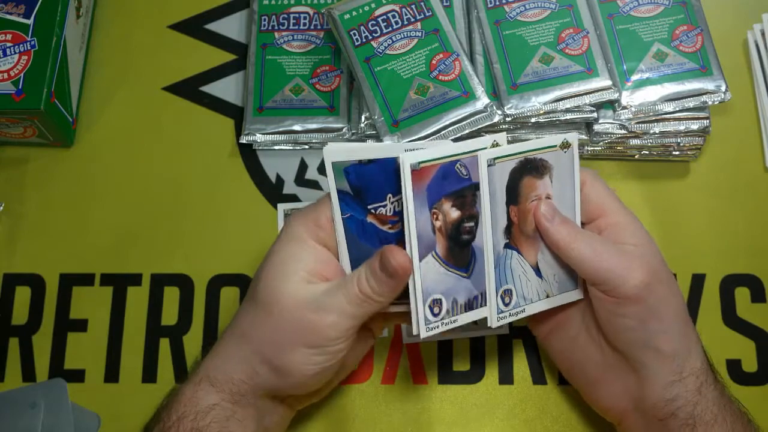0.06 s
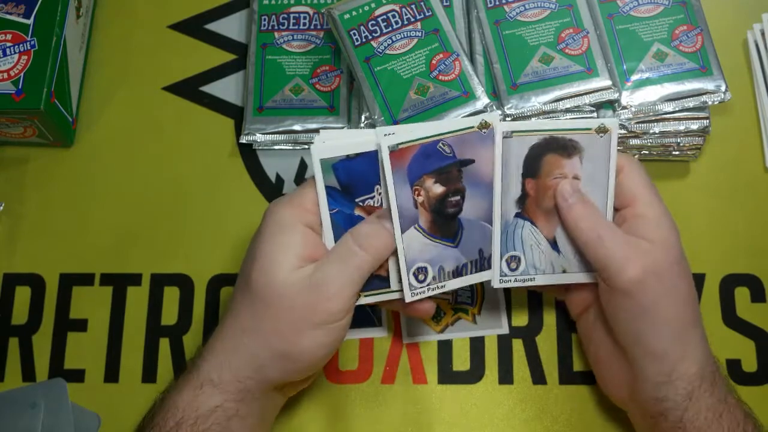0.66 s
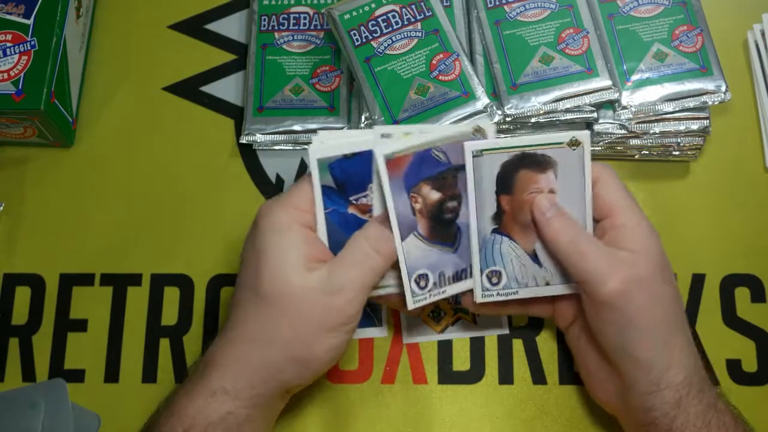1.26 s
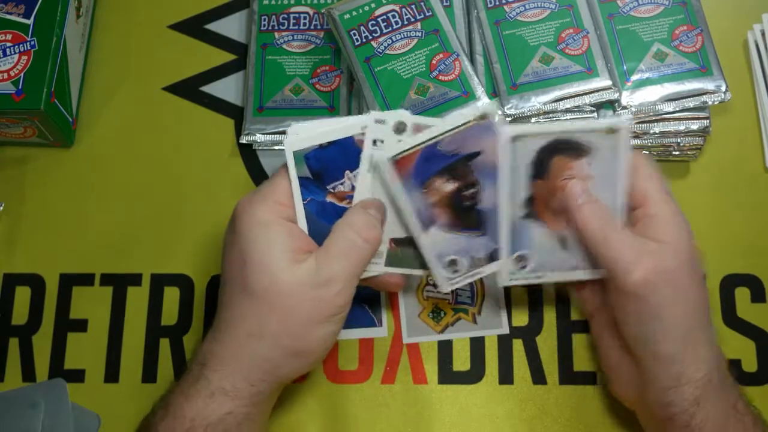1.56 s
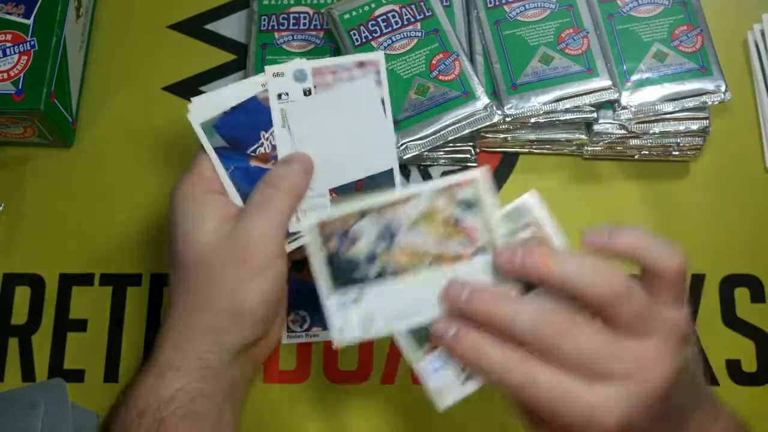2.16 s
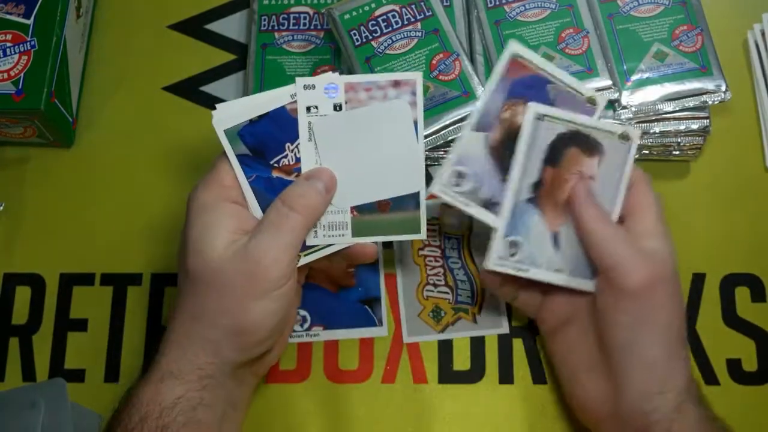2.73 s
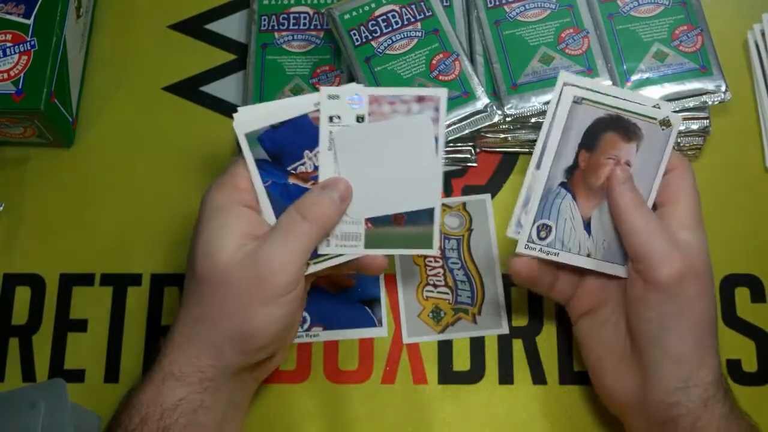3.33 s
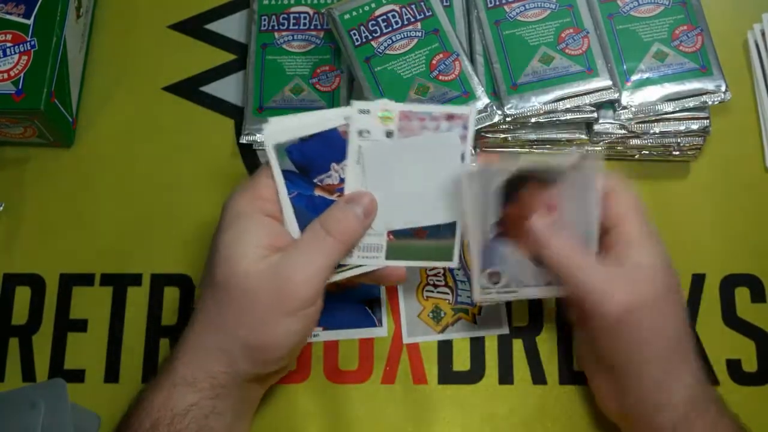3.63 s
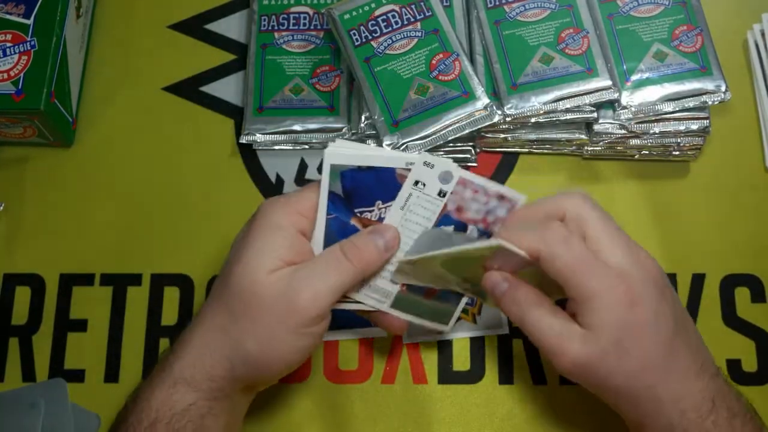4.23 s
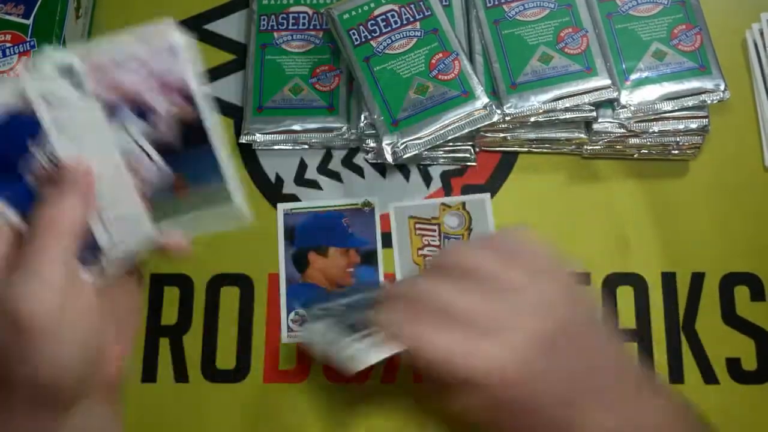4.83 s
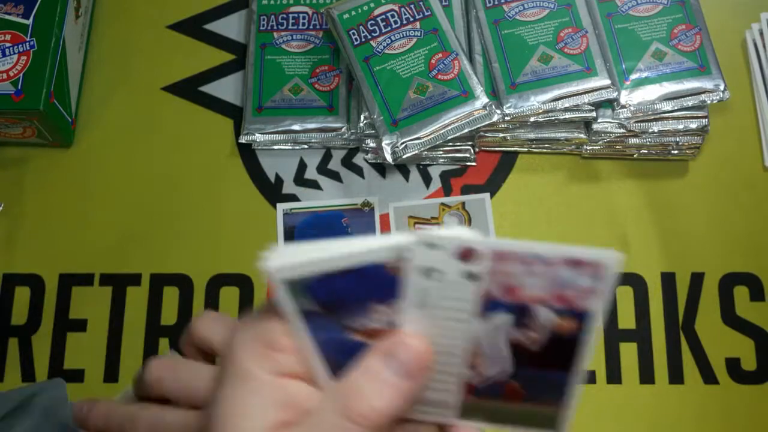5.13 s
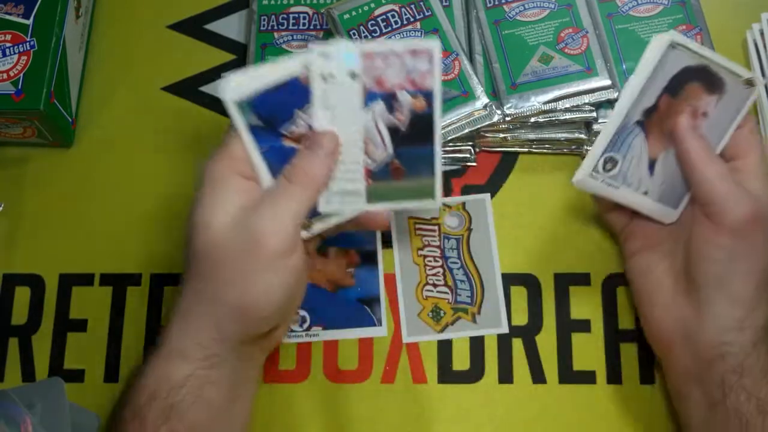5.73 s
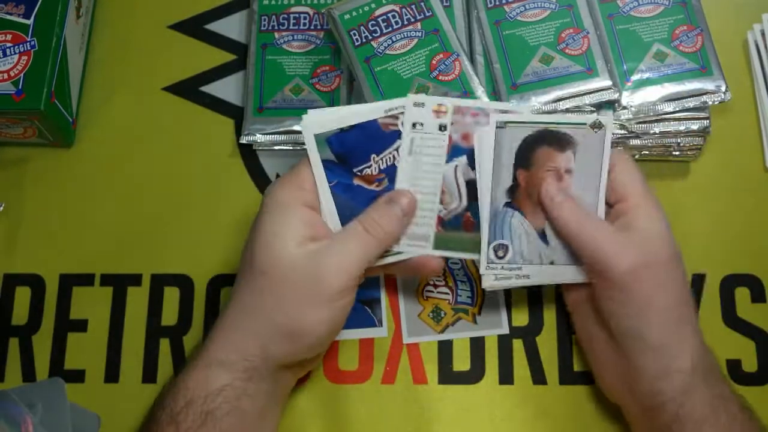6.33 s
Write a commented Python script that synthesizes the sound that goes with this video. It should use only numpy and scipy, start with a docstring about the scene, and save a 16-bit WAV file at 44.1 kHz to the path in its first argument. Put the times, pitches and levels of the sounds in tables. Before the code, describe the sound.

Cardboard trading cards slide and flick against each other in someone's hands, with light clicks and soft swishes over a low hum.

```python
"""Cardboard trading cards are sorted by two hands above a desk mat in a small room.
Their faces rub together with a grainy hiss; edges catch and flick free, or land on the mat,
with a snap that leaves the card ringing briefly. The arms rock the desk and the microphone
on it, making a deep rumble, and a fan hums in the background throughout."""
import sys
import numpy as np
from scipy import signal
from scipy.fft import rfft, irfft, next_fast_len
from scipy.io import wavfile
from scipy.ndimage import uniform_filter1d

SR = 44100
rng = np.random.default_rng(int(sys.argv[2]) if len(sys.argv) > 2 else 0)


def bounce(signal):
    """Save signal as a 16-bit WAV file at the path given by the first command-line argument."""
    frames = np.transpose(np.atleast_2d(signal))
    limited = np.clip(frames, -1, 1)
    pcm = np.round(limited * 32767).astype(np.int16)
    wavfile.write(sys.argv[1], SR, pcm)


N = 290178
TIME = np.arange(N) / SR
PADDED = next_fast_len(N, True)
FREQ = np.fft.rfftfreq(PADDED, 1 / SR)


def undb(db):
    """Turn decibels into a number to multiply by."""
    return 10 ** (np.asarray(db) / 20)


def shape(points, freq=FREQ):
    """Gain at each frequency, from a tone curve of (f/Hz, level/dB) points."""
    hz, db = np.transpose(points)
    return undb(np.interp(np.log(freq + 1), np.log(hz), db))


def resonance(hz, width):
    """Gain that peaks at one pitch and falls steeply on both sides."""
    return 1 / (1 + ((FREQ - hz) / width) ** 2) ** 2


def colour(x, gain, band=(0, SR)):
    """Filter x, then scale it so its average strength (rms) inside the band is 1."""
    spectrum = rfft(x, PADDED) * gain
    inside = irfft(spectrum * (FREQ >= band[0]) * (FREQ < band[1]), PADDED)[:N]
    return irfft(spectrum, PADDED)[:N] / inside.std()


def noise():
    """White noise: an even hiss."""
    return rng.standard_normal(N)


def wander(rate):
    """A smooth random drift that takes a new course `rate` times a second."""
    step = max(int(SR / rate), 1)
    return 2.4 * uniform_filter1d(np.repeat(rng.standard_normal(N // step + 1), step), step)[:N]


def tap_response(points, size=512):
    """The sound of one sharp tap on something with this tone curve."""
    cepstrum = irfft(np.log(shape(points, np.fft.rfftfreq(size, 1 / SR))))
    # fold the second half onto the first, so nothing sounds before the tap
    cepstrum[1:size // 2] *= 2
    cepstrum[size // 2 + 1:] = 0
    return irfft(np.exp(rfft(cepstrum)))


def stroke(start, end, ramp, ease_s=0.013):
    """Speed of a hand movement that builds, holds and eases off; each ramp is a share of its length."""
    progress = np.clip((TIME - start + ease_s) / (end - start + 2 * ease_s), 0, 1)
    return np.sin(np.pi / 2 * np.clip(np.minimum(progress, 1 - progress) / ramp, 0, 1)) ** 1.5


# the fan's hum tones: f/Hz, width/Hz, level/dB
FAN_HUM = [(83, 34, -64.5), (162.3, 18.5, -67.5), (310.4, 5.3, -75), (468.7, 44, -78.5)]
# tone curve of the moving air: f/Hz, relative level/dB
AIR_TONE = [(20, -6), (55, -3), (100, 6.5), (135, -4.5), (200, -6), (300, -8), (400, -18.5), (600, -20),
            (900, -26), (1600, -30.5), (3200, -35.5), (7000, -37.5), (13000, -41), (16000, -47.5)]


def fan(air_db=-66.33):
    """A fan hums on a few unsteady tones over the even rush of moving air."""
    hum = sum(undb(db) * colour(noise(), resonance(hz, width)) for hz, width, db in FAN_HUM)
    air = colour(noise(), shape(AIR_TONE), band=(200, SR))
    return hum + undb(air_db) * air


def swing(hz, width):
    """One slow vibration of the desk, even in strength but drifting in pitch."""
    wave = signal.hilbert(colour(noise(), resonance(hz, width)), PADDED)[:N]
    strength = np.sqrt(uniform_filter1d(abs(wave) ** 2, size=4000) / 2)
    return wave.real / strength


# the desk's natural vibrations, lowest first: f/Hz, width/Hz, relative level/dB
DESK_TONES = [(13.43, 3.52, 1), (25.5, 10, -6.5), (36, 8.9, -17)]
# arms reaching: start t/s, end t/s, sway level/dB, shudder level against the sway/dB
ARM_REACHES = [(0.527, 1.274, -46.5, -5), (1.454, 1.864, -48, -11), (1.977, 2.315, -42, -15),
               (2.269, 2.645, -38, 1), (3.619, 4.026, -39.5, -2.5), (4.084, 4.49, -43.5, 1.5),
               (4.681, 4.991, -43, -17), (5.683, 5.997, -38, -5)]


def desk_rocking(resting_db=-50, ramp=0.22):
    """The desk always sways and shudders a little; each reach of an arm rocks it harder."""
    sway = shudder = undb(resting_db)
    for start, end, db, shudder_db in ARM_REACHES:
        reach = stroke(start, end, ramp)
        sway = sway + undb(db) * reach
        shudder = shudder + undb(db + shudder_db) * reach
    lowest, *upper = (undb(db) * swing(hz, width) for hz, width, db in DESK_TONES)
    return sway * lowest + shudder * sum(upper)


# card edges flicking free or landing: t/s, low body level/dB, middle crack level/dB,
# high edge level/dB, contact t/ms, drag level against the snap/dB, ring t/ms,
# main ring f/Hz, its level/dB, second ring f/Hz, its level/dB
CARD_FLICKS = [(0.0496, -20, -19.5, -33, 4.4, -29, 0.66, 4560, -6, 6600, -16.5),
               (0.059, -21, -15.5, -22, 1, -20, 12, 804, -1.5, 3870, -16),
               (0.14, -19.5, -29.5, -33, 9, 2, 4.9, 1330, -15.5, 3050, -17),
               (0.1622, -24.5, -37.5, -44, 4.8, -20, 2.6, 900, -41, 2980, -36),
               (0.225, -26, -31, -37.5, 3.6, -5, 1.9, 1000, -18, 3830, -26),
               (0.2357, -53, -35, -43, 1.5, -15, 1.5, 3550, -26, 6260, -29),
               (0.6066, -44, -16, -35, 0.6, -22, 1.4, 3170, -13, 5250, -14.5),
               (0.6075, -21, -31, -28, 1.6, -25, 1.7, 5300, -16, 2700, -21),
               (0.619, -37, -27, -41, 4, 4, 2, 2700, -22, 6780, -31),
               (0.7457, -30, -39.5, -48, 2.5, 2, 2.4, 3300, -23, 4930, -34),
               (0.7868, -24.5, -17, -35.5, 1, -9, 2.3, 3930, -9, 3070, -23),
               (0.8452, -46, -45, -42, 3, -12, 3, 3080, -32, 4280, -28),
               (1.0547, -25, -24.5, -35, 2.5, -14, 1.3, 3550, -14.5, 2300, -38),
               (1.2864, -21, -22.5, -31, 6.6, -6, 1.9, 3900, -2.5, 6970, -15),
               (1.2995, -16.5, -20.5, -34, 1.3, -8, 2.6, 2670, -7, 1020, -16),
               (1.304, -20, -16, -31, 2.2, -17, 2.5, 1070, -2.5, 2730, -7),
               (1.3062, -34, -23, -40, 1.4, -13, 2.2, 3480, -3, 7400, -11),
               (1.3783, -44, -40, -35, 0.72, -22, 1.4, 3450, -33, 6930, -29),
               (1.4001, -12.5, -13, -20, 4.7, -17, 3.6, 3720, -3, 6300, -9),
               (2.8, -11, -27.5, -28, 6.7, -20, 1.7, 2630, -22, 6100, -31),
               (2.803, -11.5, -21, -29.5, 32, -22, 1.5, 690, -18, 1255, -22),
               (2.953, -29, -45, -49, 1.7, -15, 1.3, 4700, -36, 3910, -45),
               (3.648, -28, -36.5, -46, 4.4, -25, 3.5, 2680, -28, 4700, -29),
               (3.6718, -18, -28.5, -36, 2.43, -14, 2, 2420, -12, 593, -14.5),
               (3.853, -36, -39, -45.5, 1.43, -8, 2.8, 4194, -20.5, 6580, -39),
               (4.0177, -22, -31, -42, 2.3, 1, 2.1, 3860, -18, 2320, -19),
               (4.0324, -46, -16.5, -31, 4.4, -11, 3.7, 3380, -6, 2773, -18),
               (4.1832, -35, -21, -50, 2.4, -1, 1.6, 4200, -12.5, 2800, -13),
               (4.1889, -16, -20, -19.5, 1.15, -16, 3.3, 1428, -8, 10970, -6),
               (4.213, -8, -5.5, -21.5, 0.8, -37, 1.5, 2680, -8, 1560, -1.5),
               (4.217, -22, -18, -26, 2.8, -19, 1.3, 2300, -14, 7300, -8),
               (4.2505, -37, -27.5, -37, 3.6, -11, 2.6, 1225, -19, 3380, -33),
               (4.331, -23, -21, -26.5, 9, -10, 2.6, 4880, -8, 2570, -13),
               (4.348, -16, -21.5, -21, 2.55, -10, 3.6, 408, -3, 1366, -12.5),
               (5.0263, -27, -38.5, -38.5, 13, -6, 3.1, 6500, -31, 2700, -42),
               (6.0255, -17.5, -27, -79, 1.9, -18, 4, 1300, -7.5, 630, -8),
               (6.044, -33, -37, -70, 1.74, -15, 2.3, 4040, -43, 1334, -35),
               (6.3736, -15, -27.5, -35.5, 3.7, 1, 2, 2840, -14.5, 988, -16)]


def flicks(snap_ms=0.31, flutter_db=-13, flutter_ms=9, drag_ms=12.6, flex=0.056, size=4096):
    """An edge drags, snaps free and chatters on the next card, while its own card rings on two tones."""
    out = np.zeros(N + 2 * size)
    ms = TIME[:size] * 1000
    for when, body, crack, edge, contact_ms, drag_db, ring_ms, *rings in CARD_FLICKS:
        fades = np.exp(-ms / np.array([[contact_ms], [flutter_ms], [drag_ms]]))
        bursts = rng.standard_normal((3, size)) * fades
        chatter, flutter, drag = bursts / np.linalg.norm(bursts, axis=1, keepdims=True)
        snap = chatter + undb(flutter_db) * flutter
        snap[0] += snap_ms / contact_ms  # a shorter contact gives a cleaner click
        # the drag swells until the edge slips off
        spectrum = rfft(np.concatenate([undb(drag_db) * drag[::-1], snap / np.linalg.norm(snap)]))
        # even out the push, so that the tone comes from the card
        push = irfft(spectrum / np.sqrt(uniform_filter1d(abs(spectrum) ** 2, size=130)))
        card = tap_response([
            (120, body - 18), (420, body), (1050, body - 2), (1800, (body + crack) / 2 - 3.5),
            (2800, crack), (3900, crack - .5), (5200, crack + 0.32 * (edge - crack)),
            (7500, edge + 3.2), (10500, edge), (15500, edge - 11)])
        hit = signal.fftconvolve(push, card)[:2 * size]
        fade = np.exp(-ms / ring_ms)
        for hz, db in (rings[:2], rings[2:]):
            # the card is still bending, so its pitch wobbles
            bend = uniform_filter1d(rng.standard_normal(size), size=64)
            phase = 2 * np.pi * np.cumsum(hz * (1 + flex * bend / bend.std())) / SR
            hit[size:] += undb(db) * 2 * fade / fade.sum() * np.sin(phase)
        start = int(when * SR)
        out[start:start + 2 * size] += hit
    return out[size:size + N]


def skid_speed(base_db=-66, follow=0.4, slowing_s=0.034):
    """After each flick the card skids to rest, starting faster after a louder crack."""
    kicks = np.zeros(N)
    for when, _, crack_db, *_ in CARD_FLICKS:
        kicks[int(when * SR)] = undb(base_db + follow * crack_db)
    return signal.lfilter([1], [1, -np.exp(-1 / (slowing_s * SR))], kicks)


def rubbed_tone(grip, hz, width_hz):
    """Rubbing keeps a card ringing: a band of noise around a moving pitch."""
    flicker = colour(noise() * grip, resonance(0, width_hz))
    return np.sqrt(2) * flicker * np.sin(2 * np.pi * np.cumsum(hz) / SR)


# papery tones of a sliding card: multiple of the whisper pitch, width/Hz, relative level/dB
WHISPER_TONES = [(0.998, 760, -1), (1.529, 800, -10), (1.867, 603, -13)]


def whisper(grip, hz):
    """A rubbed card whispers on a few high, breathy tones."""
    return sum(undb(db) * rubbed_tone(grip, ratio * hz, width) for ratio, width, db in WHISPER_TONES)


# tone curves of a slide's low body, middle rub and high hiss: f/Hz, relative level/dB
BODY_TONE = [(200, -19), (450, -14), (750, 10.5), (1000, 0), (1300, 2.5), (1900, -10.5), (2400, -3),
             (3200, -50), (8000, -59)]
RUB_TONE = [(900, -46), (1900, -3), (2600, 1), (3400, -3), (4700, -1), (6000, -7), (10000, -28)]
HISS_TONE = [(2000, -10.5), (4400, -0.5), (5200, -5.5), (6050, 1.5), (7400, 2), (8500, 0.5), (9700, 1.5),
             (10800, -1.5), (11700, -2.5), (13000, -6.5), (16000, -9)]


def friction(pressure, rasp_hz, whisper_hz, whisper_db, snags_per_s=30, snag_db=13, rasp_db=0.5):
    """Paper fibres catch and slip in tiny grains, making three steady noises: body, rub and hiss."""
    drift = 1 + 0.013 * wander(6)  # the shifting grip moves the pitches a little
    grain_db = 0.5 * wander(1800)
    judder_db = np.interp(pressure, (0, 1), (1, 0.98)) * wander(90)
    grip = undb(grain_db + judder_db)
    snags = undb(snag_db) * noise() * (rng.random(N) < snags_per_s / SR)  # stray fibres and corners
    body, rub, hiss = (colour(noise() * grip + snags, shape(tone))
                       for tone in (BODY_TONE, RUB_TONE, HISS_TONE))
    rasp = undb(rasp_db) * rubbed_tone(grip, drift * rasp_hz, width_hz=720)  # the card bending
    papery = undb(whisper_db) * whisper(grip, drift * whisper_hz)
    # mix the tones in without making the noises louder
    return body, (rub + rasp) / np.hypot(1, rasp.std()), (hiss + papery) / np.hypot(1, papery.std())


# card faces sliding: start t/s, end t/s, hiss level/dB, finger pressure (0 to 1),
# rasp f/Hz, whisper f/Hz, whisper level against the plain hiss/dB
CARD_SLIDES = [(0.069, 0.132, -74.5, 1, 3004, 7170, 2), (0.2, 0.25, -71.5, 0.62, 3090, 6200, -8),
               (0.291, 0.405, -58.5, 0.69, 3430, 6000, -9), (0.431, 0.51, -76.5, 0.94, 3100, 6170, -8),
               (0.57, 0.624, -76, 0.9, 3210, 6520, -3), (0.751, 0.91, -72, 0.9, 3290, 6200, -11),
               (0.922, 0.984, -71.5, 0.97, 3620, 6200, -7), (0.98, 1.048, -62.5, 0.76, 3160, 7260, -8),
               (1.001, 1.03, -63.5, 0.76, 2860, 7315, -6), (1.063, 1.281, -82, 0.93, 3230, 7160, 4),
               (1.272, 1.375, -66.5, 0.9, 3430, 7170, 1), (1.769, 1.883, -70.5, 0.5, 2750, 6050, -1),
               (1.851, 1.96, -75, 0.25, 2820, 6000, -1), (2.04, 2.11, -79, 0.58, 2800, 7440, 8),
               (2.37, 2.44, -73, 0.64, 2890, 6060, -5), (2.453, 2.509, -71.5, 0.42, 2664, 6250, 0),
               (2.549, 2.58, -78, 0.28, 2726, 6370, 2), (2.639, 2.706, -66.5, 0.17, 2720, 6200, -10),
               (2.729, 2.835, -67.5, 0.52, 2700, 6140, -7), (2.982, 3.09, -73.5, 0.65, 2223, 5830, 0),
               (3.098, 3.18, -80, 0.1, 2690, 6140, 2), (3.216, 3.339, -73, 0.06, 2740, 6400, -7),
               (3.341, 3.411, -78.5, 0.48, 2720, 6150, -2), (3.415, 3.504, -72, 0.03, 2730, 6420, 1),
               (3.664, 3.702, -72.5, 0.8, 2560, 6400, 0), (3.753, 3.776, -76, 0.69, 2640, 6270, -4),
               (3.87, 3.893, -68, 0.88, 2570, 6320, -3), (3.934, 3.987, -71, 0.9, 2587, 6410, 1),
               (4.107, 4.142, -68, 1, 3150, 6440, 3), (4.134, 4.174, -69.5, 0.9, 4150, 6240, 4),
               (4.185, 4.185, -67.5, 0.92, 3600, 6460, -4), (4.325, 4.37, -64.5, 0.02, 3000, 7600, -5),
               (4.588, 4.774, -68.5, 0.3, 2200, 5790, -9), (6.124, 6.28, -75, 0.8, 1497, 6210, -6.5),
               (6.275, 6.345, -69, 0.92, 1456, 7340, -2), (6.363, 6.53, -75.5, 0.8, 1398, 5830, -6)]


def slides(ramp=0.38, body_db=(-10.5, 7.5), rub_db=(-13, 5.5), knee_db=-74, body_follow=0.08):
    """Cards slide over each other: a light touch mostly hisses, pressing brings out body and rub."""
    moves = [(undb(db) * stroke(start, end, ramp), *touch) for start, end, db, *touch in CARD_SLIDES]
    moves.append((skid_speed(), 0.41, 3290, 6340, -8))  # speed, then the table's last four columns
    # each pair of dB values runs from the lightest touch to full pressure
    body_level, rub_level, hiss_level = (
        np.sqrt(sum((speed * undb(np.interp(pressure, (0, 1), pair))) ** 2
                    for speed, pressure, *_ in moves))
        for pair in (body_db, rub_db, (0, 0)))
    # above the knee level the body barely grows, so a fast slide is brighter
    body_level /= np.maximum(body_level / undb(knee_db), 1) ** (1 - body_follow)
    # the fastest card sets the grip and the pitches
    speeds, *touches = zip(*moves)
    fastest_touch = np.array(touches, float)[:, np.argmax(speeds, axis=0)]
    body, rub, hiss = friction(*uniform_filter1d(fastest_touch, size=200))
    return body_level * body + rub_level * rub + hiss_level * hiss


def room(x, echo_db=-14, fade_60db_s=0.31, damp_hz=7000, gap_s=0.0039):
    """A small furnished room adds a short, duller echo."""
    tail = noise() * np.exp(-np.log(1000) * TIME / fade_60db_s) * (TIME > gap_s)
    tail = signal.sosfilt(signal.butter(1, damp_hz, fs=SR, output="sos"), tail / np.linalg.norm(tail))
    return x + undb(echo_db) * signal.fftconvolve(x, tail[:SR // 2])[:N]


# hands bumping the mat: start t/s, end t/s, level/dB
MAT_BUMPS = [(0.582, 0.71, -46), (0.706, 0.9, -35.5), (0.953, 1.178, -40), (1.275, 1.328, -44),
             (2.341, 2.515, -46.5), (4.14, 4.424, -36.5)]
# tone curve of a bump: f/Hz, relative level/dB
BUMP_TONE = [(15, 5), (32, 12), (65, -8.5), (110, -11.5), (200, -21), (400, -37), (900, -43.5),
             (4000, -100)]


def mat_bumps(ramp=0.3):
    """Hands bump the mat, and the desk passes the soft thuds up the microphone stand."""
    level = sum(undb(db) * stroke(start, end, ramp) for start, end, db in MAT_BUMPS)
    return level * colour(noise(), shape(BUMP_TONE))


def scene():
    """The cards in the room, over the desk's rumble and the fan, in one channel."""
    cards = room(flicks() + slides())
    return (cards + desk_rocking() + mat_bumps() + fan())[None]


def record(dry):
    """Cut away the highest treble, above 15850 Hz."""
    return signal.sosfilt(signal.ellip(10, .2, 70, 15850, fs=SR, output="sos"), dry)


dry = scene()
out = record(dry)
bounce(out)
```